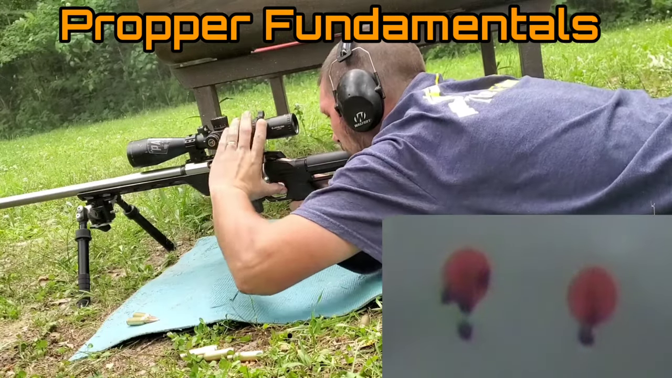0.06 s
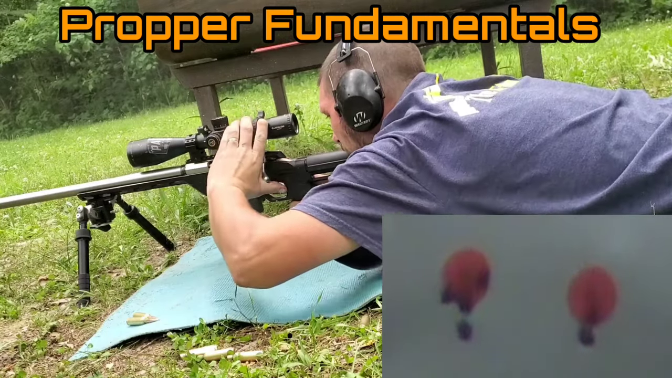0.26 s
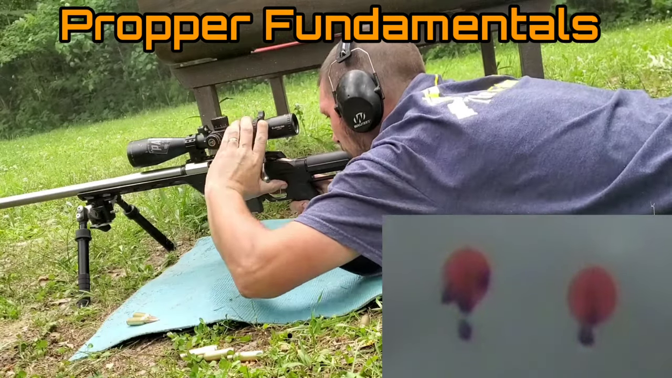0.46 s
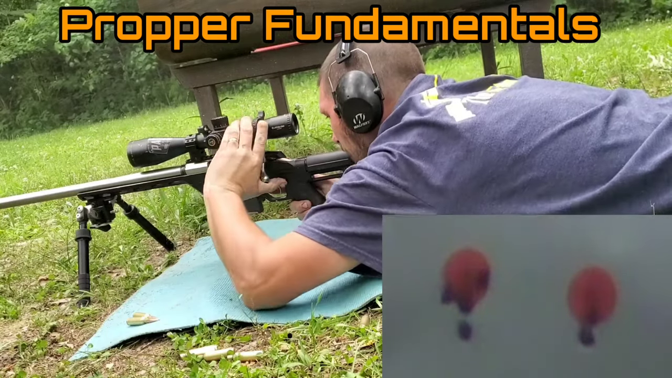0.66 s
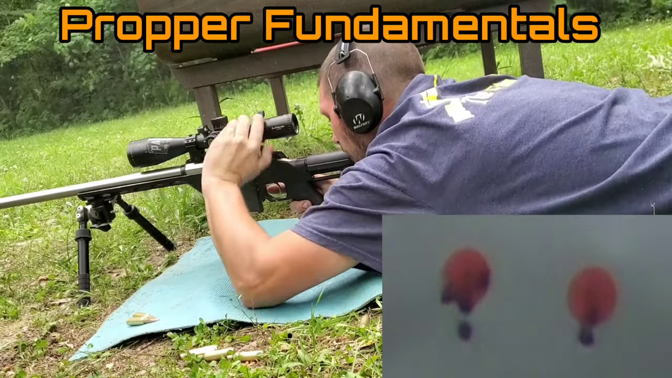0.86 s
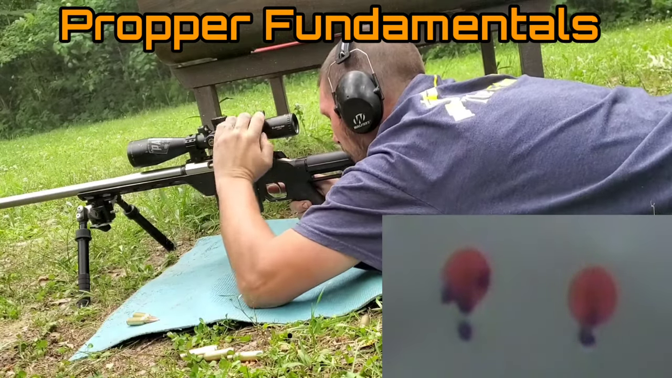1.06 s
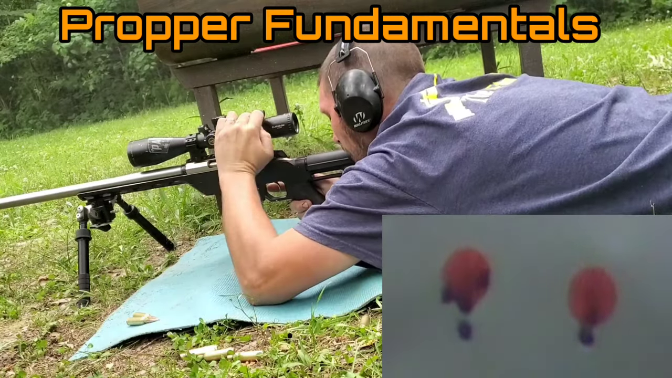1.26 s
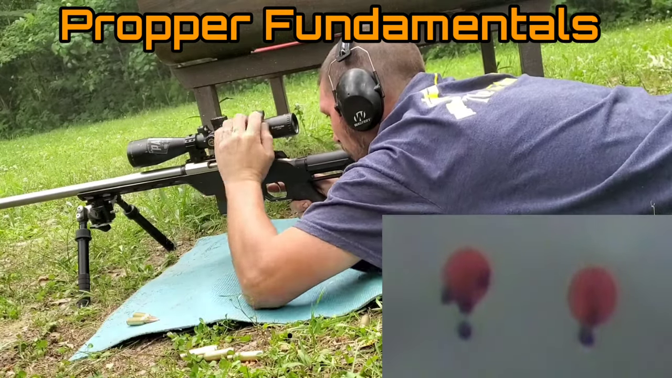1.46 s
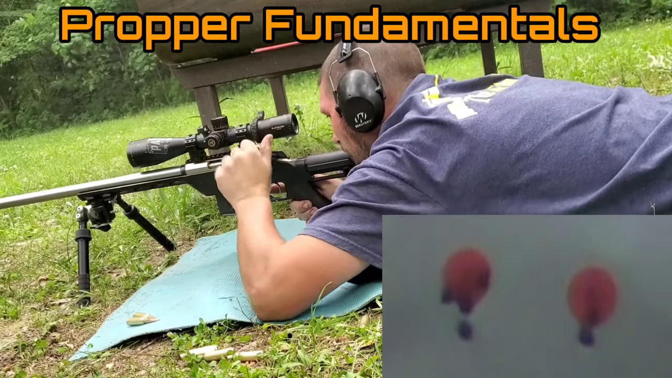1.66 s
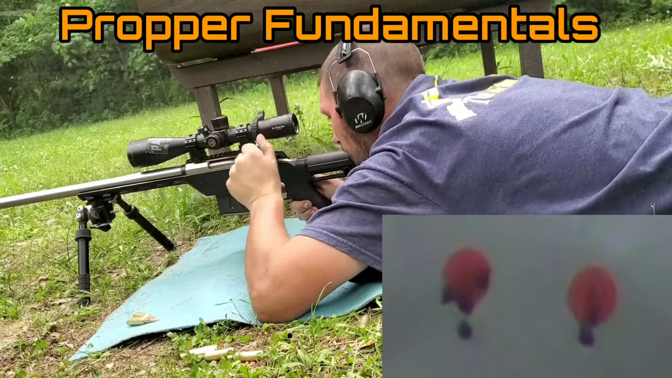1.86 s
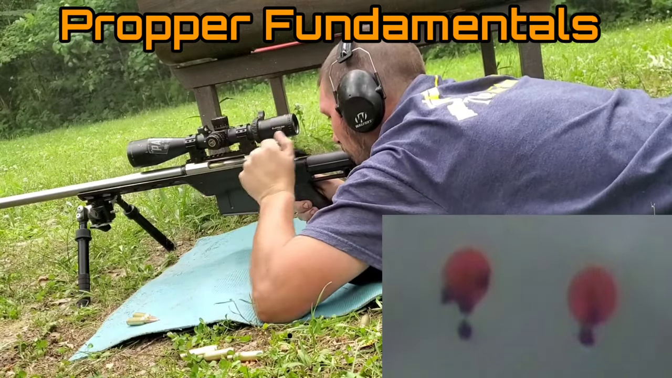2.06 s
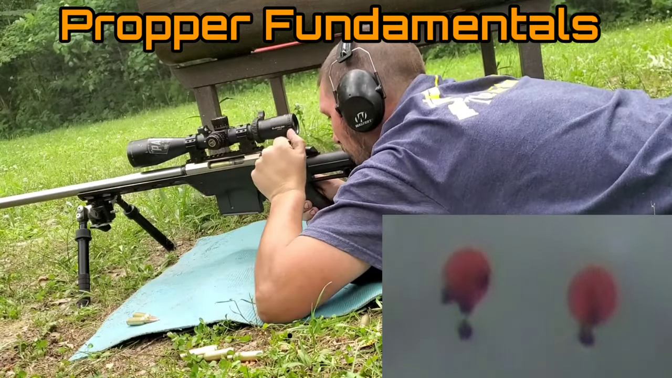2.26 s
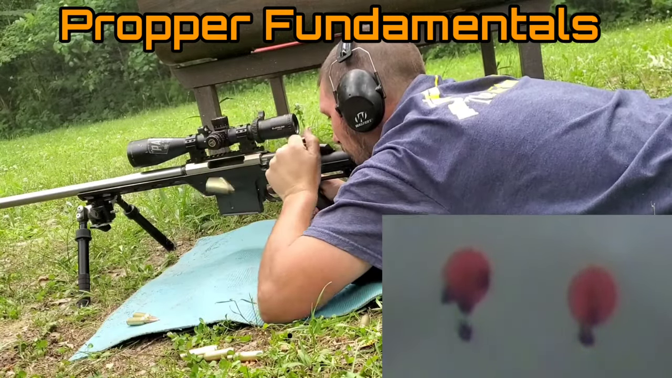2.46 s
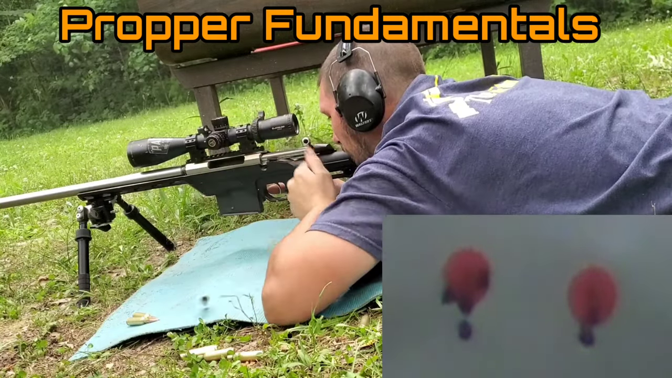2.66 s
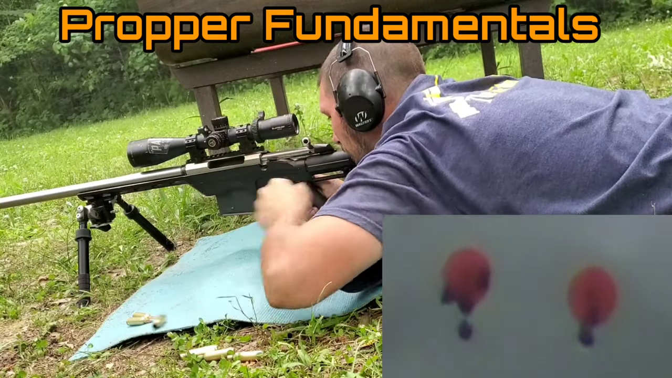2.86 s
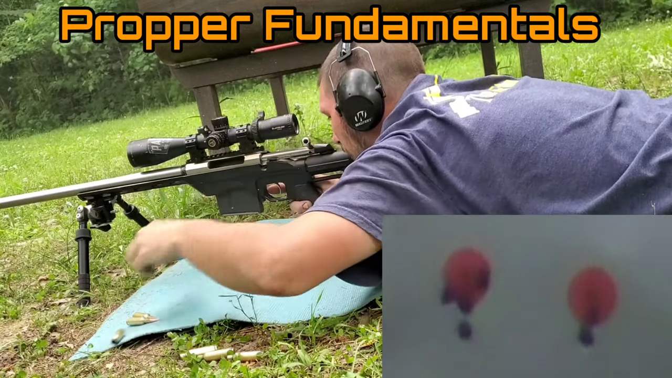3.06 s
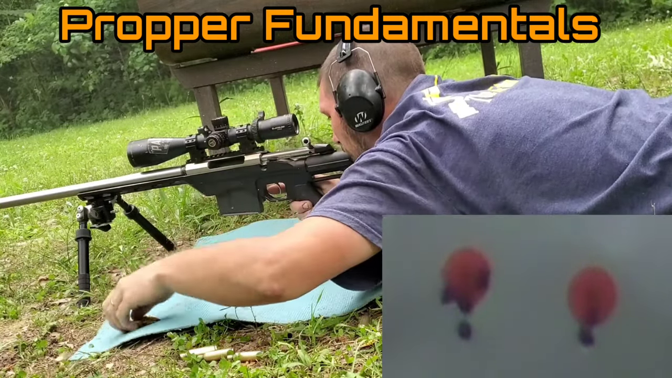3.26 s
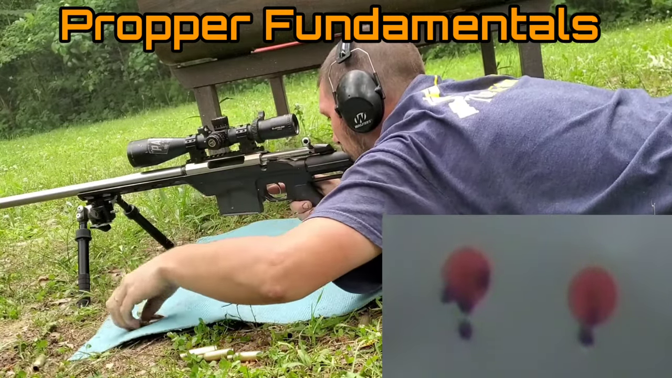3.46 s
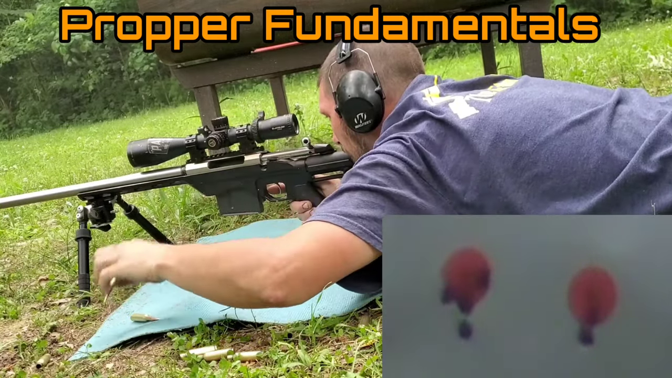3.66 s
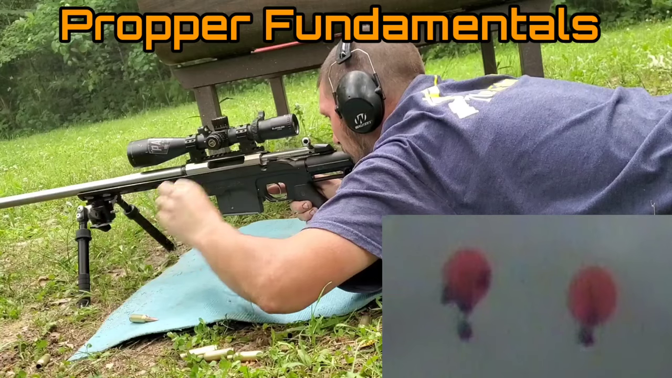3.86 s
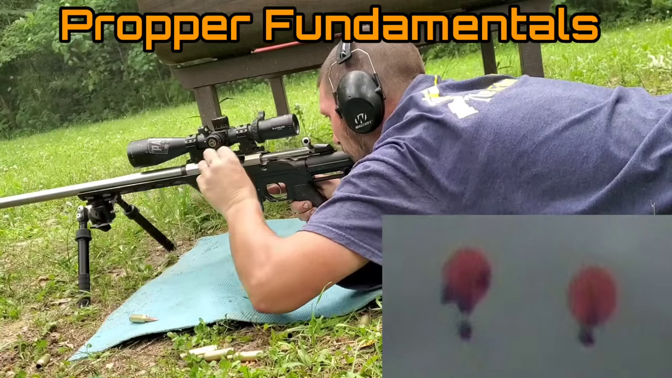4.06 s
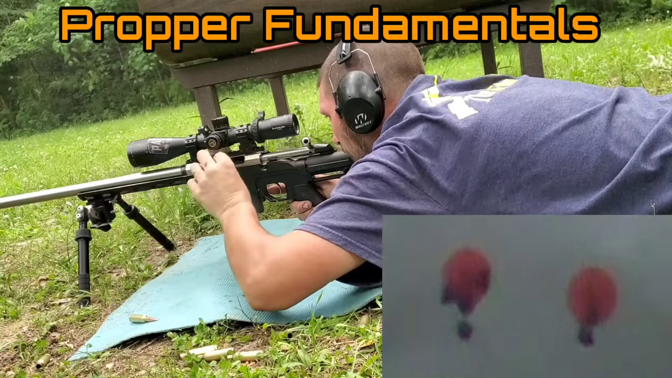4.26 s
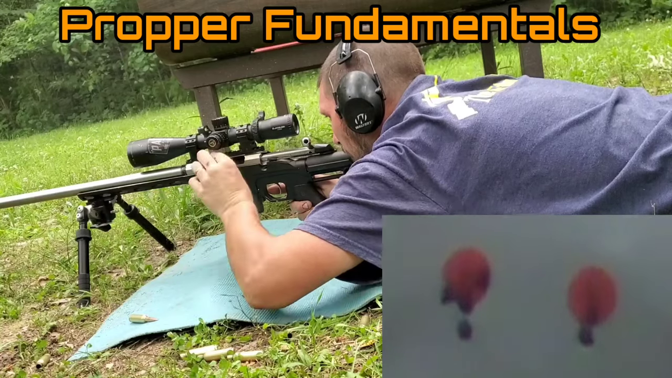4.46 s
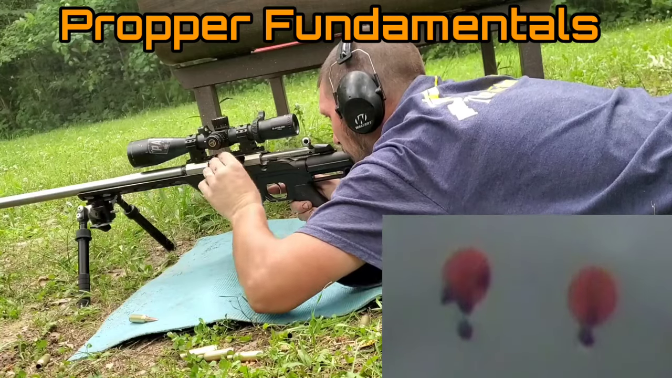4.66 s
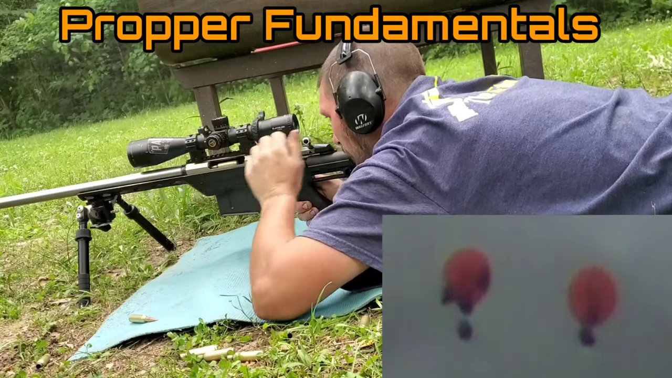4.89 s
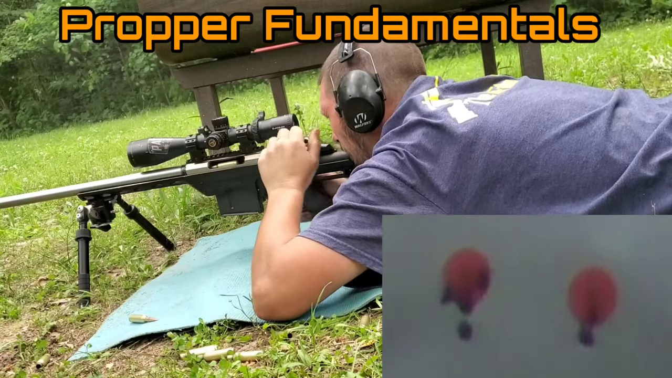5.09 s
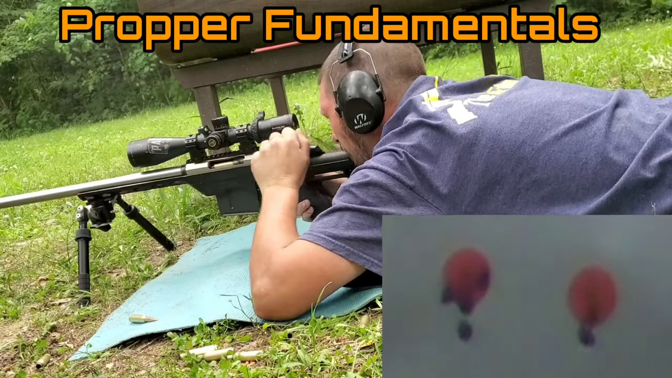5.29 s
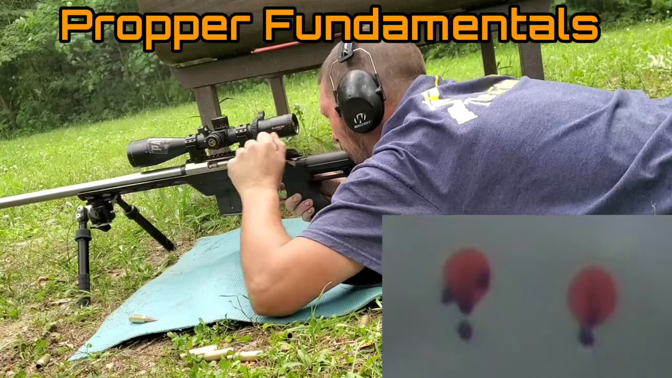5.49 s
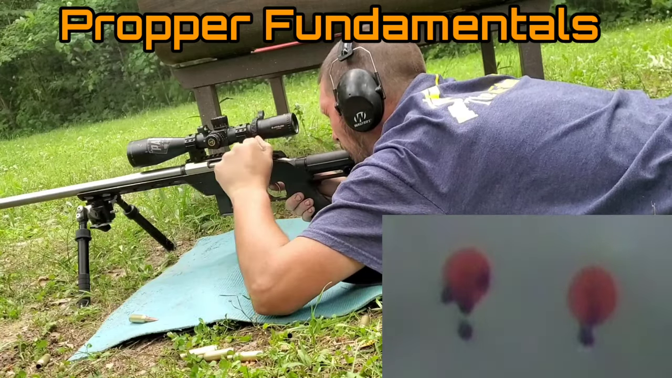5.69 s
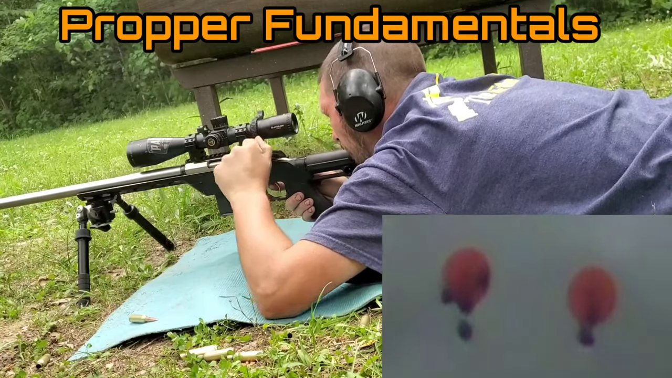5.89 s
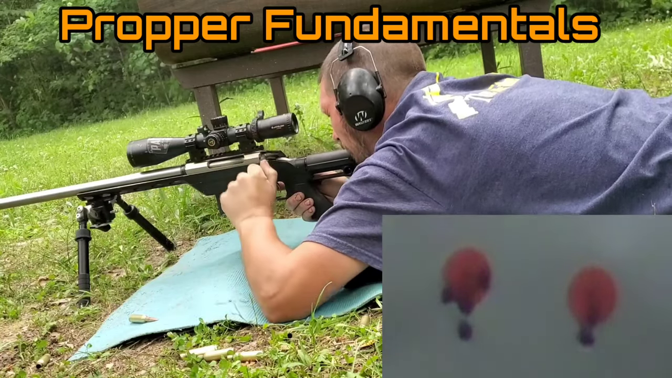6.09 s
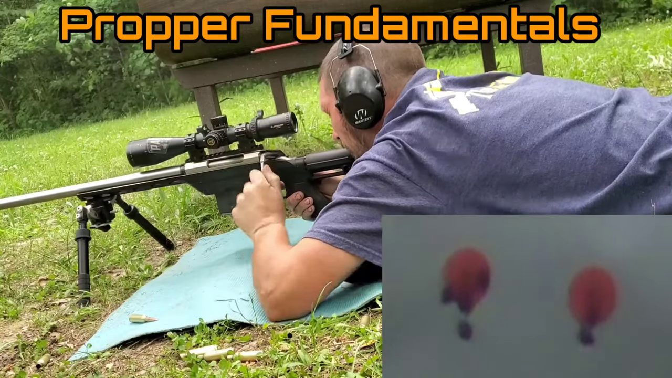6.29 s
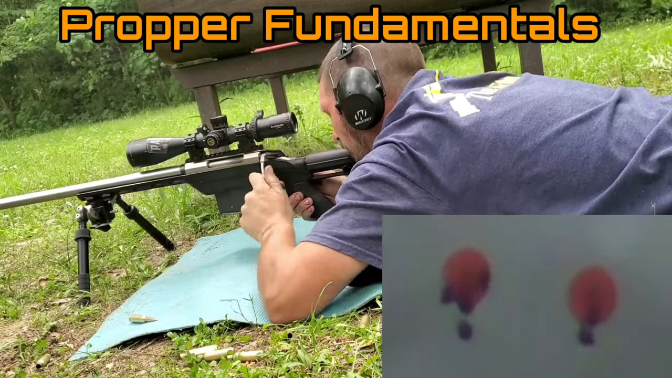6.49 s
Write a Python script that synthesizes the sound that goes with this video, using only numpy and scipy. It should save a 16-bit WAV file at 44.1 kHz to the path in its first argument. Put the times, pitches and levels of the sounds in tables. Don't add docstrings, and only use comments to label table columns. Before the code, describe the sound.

Outdoors in a grassy yard, two crickets trill steadily and high over faint traffic rumble and soft leaf hiss. Close on the left, a rifle bolt is lifted and drawn back with crisp steel clacks, and a spent case drops softly on a mat. After a quieter pause with small knocks, a round is fed and the bolt shut with harder, brighter snaps. Stereo camera microphone, dry and close.

```python
import sys
import numpy as np
from scipy import signal
from scipy.fft import rfft, irfft, next_fast_len
from scipy.io import wavfile
from scipy.ndimage import uniform_filter1d, map_coordinates

SR = 44100
rng = np.random.default_rng(int(sys.argv[2]) if len(sys.argv) > 2 else 0)


def volts_from_db(level):
    exponent = np.asarray(level, float) / 20
    return 10 ** exponent


def generate_wav(sig):
    pcm = np.round(np.clip(np.atleast_2d(sig).T, -1, 1) * 32767).astype(np.int16)
    wavfile.write(sys.argv[1], SR, pcm)


N = 288088

# frequency in Hz, level in dB per Hz.
RUMBLE_SPECTRUM = [(12, -35), (20, -12.5), (59, -1.5), (97, -6.5), (128, -8), (161, -12.5), (338, -16),
                   (468, -19.5), (700, -25), (910, -35), (1540, -120)]
# frequency in Hz, level in dB per Hz.
HISS_SPECTRUM = [(250, -26), (500, -4.5), (1000, -5), (1800, -7), (2900, -9.5), (3600, -10), (4700, -14.5),
                 (6500, -16.5), (9300, -21), (12000, -20.5), (14300, -24), (14900, -39)]
# frequency in Hz, left-right likeness from -1 to 1.
PORT_LIKENESS = [(25, 0.95), (60, 1), (130, 0.89), (290, 0.66), (640, 0.19), (1400, -0.16), (3100, 0.17),
                 (7000, 0.47), (14000, 0.17)]
TRAFFIC_DB, LEAVES_DB, CALMING_DB_PER_S = -51.5, -60, -0.21

STROKES_PER_S = 40.8
# time in seconds, near and far cricket drift in cycles.
STROKE_DRIFT = [(0, .23, 1.73), (1.3, .2, .7), (2.5, .25, -.25), (3.6, .33, -1.18), (4.75, .23, -2.27),
                (5.85, .19, -3.31), (6.6, .11, -4.05)]
# time in seconds, effort in dB.
TRILL_EFFORT = [(0, -53), (.2, -50.5), (.5, -54), (.8, -51.5), (3.6, -50.5), (5.26, -51.5), (5.87, -50.5),
                (6.53, -52)]
# frequency in Hz, t60 in seconds.
YARD_DECAY = [(500, 0.29), (3000, 0.13), (8000, 1), (14000, 0.2)]

# frequency in Hz, width in Hz, level in dB.
RECEIVER_MODES = [(2020, 960, -13.5), (2726, 85, 0.5), (3520, 630, 3.5), (3747, 1015, 4.5), (4500, 2360, 2),
                  (5200, 1100, 6.5)]
BOLT_MODES = [(6080, 1220, 1), (6940, 580, 3.5), (7910, 560, -5.5), (8260, 220, 3), (9460, 1000, -12.5)]
SMALL_PART_MODES = [(11500, 800, -9), (13600, 520, 0), (12940, 2800, 27), (14500, 560, 3)]
STOCK_MODES = [(432, 250, -7), (644, 63, 4.5), (1189, 118, 1.5), (1480, 145, -3)]
MAT_MODES = [(120, 130, -5), (500, 900, -8), (1240, 230, -1)]

RAIL_SLAPS = [(2.1874, -33, 0, 5100), (2.1944, -45, 6, 2720), (2.2134, -24, -5, 4860),
              (2.2155, -26, 3, 4500), (4.6584, -44, -2, 4900), (4.6675, -32, -5, 4500),
              (5.757, -31, -12, 3000), (5.3797, -47, 0, 3370), (5.7404, -20, -2, 4870)]
BOLT_STOPS = [(.8845, -48, 10, 4000), (.8869, -24, -2, 3900), (.9644, -33.5, -3, 4500),
              (2.2438, -32.5, -4, 3720), (2.4428, -26.5, -15, 3620), (2.4534, -28.5, -5, 3070),
              (4.6823, -21.5, 6, 3730)]
LOOSE_RATTLES = [(1.325, -37, -4, 3740), (1.3274, -25, 7, 3750), (4.7147, -27, -14, 3970),
                 (5.3986, -25, -11, 3160), (5.4914, -29.5, -11, 3880), (5.5578, -38.5, -18, 3640),
                 (5.7600, -13, -5.5, 5200), (6.1335, -35.5, -11, 3470)]
CATCH_SNAPS = [(.9767, -31.5, -5, 3200), (1.3396, -19.5, 1, 3900), (2.4932, -31.5, -30, 3570),
               (4.3794, -49, -14, 3540), (4.400, -50, -14, 3500), (4.423, -50, -11, 3600),
               (5.5288, -40.5, -9, 3580), (5.7632, -22, -0.5, 3500), (6.124, -36.5, 3.5, 4050),
               (6.3714, -25, -4, 3120)]
TIGHT_DB, LOOSE_DB = -13.5, -0.5
STILL_DB, JOLTED_DB = -23, -13.5
# start in seconds, stock peak in dB, receiver re stock in dB.
STOCK_KNOCKS = [(.9502, -42, 5), (2.0497, -53, 4), (2.0654, -45, -3), (2.159, -50.5, 3), (2.726, -41.5, -5),
                (4.1654, -47.5, 1), (4.5106, -47, 0), (4.7054, -35.5, 5), (4.799, -47, -8),
                (4.8396, -49, -9), (5.1627, -46, -3.5), (5.3287, -50, -6), (5.5764, -44.5, 3.5),
                (5.5894, -50, 3)]
# start in seconds, length in seconds, receiver peak in dB, bolt and stock re receiver in dB.
STEEL_SLIDES = [(0.893, 0.02, -31.5, -2, -6.5), (0.956, 0.037, -38.5, -12, -4),
                (1.332, 0.042, -28.5, -7, -5), (2.221, 0.039, -33.5, -15, -10),
                (2.485, 0.027, -38, -21, -18), (4.657, 0.0089, -42, -8, -20), (4.694, 0.033, -28, -8, -11),
                (4.743, 0.022, -33.5, 4, -5.5), (5.735, 0.016, -35, -11, -4), (5.764, 0.031, -26, -3, -20),
                (6.128, .025, -39.5, 0, -5), (6.359, 0.042, -44, -9, -18)]

# start in seconds, pitch in Hz, peak in dB.
HELD_CLANGS = [(0.8884, 3840, -19.5), (0.888, 4290, -24), (0.976, 2990, -27), (1.328, 3650, -20),
               (1.339, 2930, -20.5), (2.4932, 3416, -12), (2.4934, 3730, -17.5), (5.560, 12150, -25),
               (5.7606, 3020, -24), (6.123, 14300, -19), (6.373, 3200, -27.5)]
CLANG_T60_S = 0.02
# start in seconds, peak in dB.
HOLLOW_TONE = (660, .07)
HOLLOW_RINGS = [(.978, -46), (1.343, -33.5), (2.218, -48), (2.246, -44), (4.701, -33), (5.765, -35.5)]
LUG_TONE = (2770, .1)
LUG_RINGS = [(2.189, -40), (2.443, -38)]
HANDLE_TONE = (4110, 0.068)
HANDLE_RINGS = [(4.684, -33), (4.7156, -33.5), (5.399, -26), (5.493, -33)]
SHROUD_TONE = (8400, 0.15)
SHROUD_RINGS = [(5.762, -34)]
CASE_TONE = (9450, 0.18)
CASE_RINGS = [(2.217, -42), (2.456, -38)]
ROUND_TONE = (12300, 0.065)
ROUND_RINGS = [(5.400, -40), (5.493, -37), (5.531, -41)]
SPRING_TONE = (14210, 0.048)
SPRING_RINGS = [(2.194, -23.5), (2.214, -17), (2.444, -29), (2.495, -38)]

# start in seconds, peak in dB.
HARD_CRACKS = [
    (1.3277, -24),
    (4.6825, -17.5),
    (5.7408, -26),
    (5.7612, -23),
]
CRACK_S = .00012
# start in seconds, peak in dB.
CASE_LANDING = (2.7243, -33)

# frequency in Hz, left-right difference in dB.
BODY_SHADOW = [(300, -2), (900, -2), (1600, 3), (2500, 14), (5000, 9), (9000, 5), (14000, 8)]
# frequency in Hz, lead in samples.
LEFT_LEAD = [(700, 8), (2500, 16)]
# frequency in Hz, gain in dB.
TOP_ROLLOFF = [(14500, 0), (15200, -15), (16550, -22), (16700, -90)]


def unit(x):
    return x / np.sqrt(np.mean(x ** 2) + 1e-20)


def along(points, hz):
    f, v = np.transpose(points)
    return np.interp(np.log(hz + 1), np.log(f + 1), v)


def curves(rows):
    s, *cols = np.transpose(rows)
    return [np.interp(np.arange(N) / SR, s, c) for c in cols]


def wobble(rate):
    knots = rng.standard_normal(int(N * rate / SR) + 4)
    return map_coordinates(knots, [np.arange(N) * rate / SR])


def filtered(x, response):
    m = next_fast_len(x.shape[-1] + 4096)
    return irfft(rfft(x, m) * response(np.fft.rfftfreq(m, 1 / SR)), m)[..., :x.shape[-1]]


def rush(spectrum, patchy_db):
    z = signal.stft(rng.standard_normal((2, N)), nperseg=512)[2]
    patches = uniform_filter1d(rng.standard_normal(z.shape[1:]), 6, 0)
    patches = uniform_filter1d(patches, 14, 1)
    pair = signal.istft(z * volts_from_db(patchy_db * unit(patches)), nperseg=512)[1][:, :N]

    def mid_side(hz):
        angle = np.arccos(np.clip(along(PORT_LIKENESS, hz), -1, 1)) / 2
        return volts_from_db(along(spectrum, hz)) * [np.cos(angle), np.sin(angle)]

    mid, side = filtered(pair, mid_side)
    return unit(np.array([mid + side, mid - side]))


def air():
    calming_db = CALMING_DB_PER_S * np.arange(N) / SR
    leaves_db = LEAVES_DB + calming_db + 1.0 * wobble(1.29) + [[4.5], [3.5]]
    traffic_db = TRAFFIC_DB + calming_db + 0.58 * wobble(3.01)
    leaves = volts_from_db(leaves_db) * rush(HISS_SPECTRUM, patchy_db=1.18)
    traffic = volts_from_db(traffic_db) * rush(RUMBLE_SPECTRUM, patchy_db=-0.25)
    return traffic + leaves


def cricket(drift, wing_hz, overtone_db):
    t = np.arange(N) / SR
    place = (STROKES_PER_S * t + drift + .5) % 1 - .5
    late = np.clip(place - .02, 0, .3)
    opening = np.clip((place + 0.22) / 0.029, 0, 1)
    closing = np.clip((.31 - place) / 0.036, 0, 1)
    gate = opening * volts_from_db(-150 * late ** 2) * closing * volts_from_db(1.74 * wobble(40))
    phase = 2 * np.pi * np.cumsum(wing_hz + 18 * wobble(25) - 7000 * late ** 2) / SR
    octave = gate * volts_from_db(-150 * (place - .06) ** 2) * np.sin(2 * phase)
    return unit(gate * np.sin(phase)) + volts_from_db(overtone_db) * unit(octave)


def yard(x, gap_s):
    hz, t, z = signal.stft(rng.standard_normal((2, SR // 3)), SR, nperseg=256)
    decay = volts_from_db(-60 * t / along(YARD_DECAY, hz)[:, None])
    tail = signal.istft(z * decay, SR, nperseg=256)[1]
    delayed = np.pad(x, (round(gap_s * SR), 0))[None]
    return signal.fftconvolve(delayed, tail / np.linalg.norm(tail[0]), axes=1)[:, :N]


def crickets():
    near_drift, far_drift = curves(STROKE_DRIFT)
    near = cricket(near_drift, wing_hz=5518, overtone_db=-17)
    far = cricket(far_drift, wing_hz=5467, overtone_db=-11.0)
    chorus_spectrum = [(4700, -60), (5000, -24), (5350, -5), (5500, 0), (5650, -12), (6000, -27), (6400, -60)]
    chorus = volts_from_db(-11) * rush(chorus_spectrum, patchy_db=1.5)
    both = near * volts_from_db([[-3.5], [-2.5]]) + far * volts_from_db([[-9], [-11]])
    smear = volts_from_db(-8) * yard(both[0], gap_s=.003)
    return volts_from_db(curves(TRILL_EFFORT)[0]) * (both + smear + chorus)


def chatter(t, shape, shared):
    common, spikes, *own = rng.standard_normal((4, len(t)))
    own = np.array(own)
    noise = shared * common + np.sqrt(1 - shared ** 2) * own
    scatter = volts_from_db(-22.5 - 60 * t / 0.33) * (1 - np.exp(-t / 0.0015)) * own
    return shape * np.exp(.4 * spikes) * noise + scatter


def struck(force, modes, favoured_hz=None):
    gains = rng.standard_normal(len(modes)) * 1.5
    if favoured_hz:
        distance = np.abs(np.log(np.transpose(modes)[0] / favoured_hz))
        gains = gains - np.minimum(30 * distance, 11)

    def resonances(f):
        total = 0
        for k, ((hz, width, db), gain) in enumerate(zip(modes, gains)):
            peak = 1j * f * width / (hz * hz - f * f + 1j * f * width)
            total = total + (-1) ** k * volts_from_db(db + gain) * peak
        return total

    answer = filtered(force, resonances)
    return answer / np.abs(answer).max()


def gun(force, bolt_db, small_db, stock_db, favoured_hz=None):
    receiver = struck(force, RECEIVER_MODES, favoured_hz)
    bolt = volts_from_db(bolt_db) * struck(force, BOLT_MODES)
    small_parts = volts_from_db(small_db) * struck(force, SMALL_PART_MODES)
    stock = volts_from_db(stock_db) * struck(force, STOCK_MODES)
    return receiver + bolt + small_parts + stock


def blows():
    kinds = [(RAIL_SLAPS, TIGHT_DB, STILL_DB), (BOLT_STOPS, TIGHT_DB, JOLTED_DB),
             (LOOSE_RATTLES, LOOSE_DB, STILL_DB), (CATCH_SNAPS, LOOSE_DB, JOLTED_DB)]
    hits = []
    for rows, small_db, stock_db in kinds:
        for s, db, bolt_db, hz in rows:
            hits.append((s, db, bolt_db, bolt_db + small_db, stock_db, hz))
    for s, stock_peak_db, receiver_db in STOCK_KNOCKS:
        hits.append((s, stock_peak_db + receiver_db, -5.5, -20, -receiver_db, 4000))
    return hits


def rings():
    free = [(HOLLOW_TONE, HOLLOW_RINGS), (LUG_TONE, LUG_RINGS), (HANDLE_TONE, HANDLE_RINGS),
            (SHROUD_TONE, SHROUD_RINGS), (CASE_TONE, CASE_RINGS), (ROUND_TONE, ROUND_RINGS),
            (SPRING_TONE, SPRING_RINGS)]
    clangs = [(*row, CLANG_T60_S) for row in HELD_CLANGS]
    return clangs + [(s, hz, db, t60) for (hz, t60), hits in free for s, db in hits]


def ringing(t, hz, t60):
    waver = np.cumsum(rng.standard_normal((2, len(t))), axis=1) * .035
    swell = volts_from_db(2.2 * unit(uniform_filter1d(rng.standard_normal(len(t)), size=300)))
    envelope = swell * volts_from_db(-60 * t / t60) * (1 - np.exp(-t / 0.00057))
    return envelope * np.sin(2 * np.pi * hz * t + waver)


def rifle():
    out, t = np.zeros((2, N + SR)), np.arange(SR // 5) / SR

    def place(s, sound):
        out[:, round(s * SR):][:, :len(t)] += sound

    blow = (1 - np.exp(-t / .0004)) * (volts_from_db(-60 * t / .033) + volts_from_db(9 - 60 * t / .006))
    for s, db, *parts in blows():
        place(s, volts_from_db(db + 5.5) * gun(chatter(t, blow, shared=0.57), *parts))
    for s, length, db, bolt_db, stock_db in STEEL_SLIDES:
        stroke = np.abs(np.sin(np.pi * np.clip(t / length, 0, 1) ** 0.53))
        small_db = bolt_db - 0.5
        place(s, volts_from_db(db) * gun(chatter(t, stroke, shared=0.57), bolt_db, small_db, stock_db))
    for s, hz, db, t60 in rings():
        place(s, volts_from_db(db) * ringing(t, hz, t60))
    for s, db in HARD_CRACKS:
        place(s, volts_from_db(db) * (1 - t / CRACK_S) * np.exp(-t / CRACK_S))
    s, db = CASE_LANDING
    place(s, volts_from_db(db) * struck(chatter(t, blow, shared=0.78), MAT_MODES))
    return out[:, :N]


def scene():
    sides = np.array([[.5], [-.5]])

    def from_left(hz):
        lead = np.exp(2j * np.pi * hz * sides * along(LEFT_LEAD, hz) / SR)
        return volts_from_db(sides * along(BODY_SHADOW, hz)) * lead

    return air() + crickets() + filtered(rifle(), from_left)


def top_cut(x):
    return signal.sosfilt(signal.butter(12, 16620, fs=SR, output="sos"), x)


def record(dry):
    mix = filtered(dry, lambda hz: volts_from_db(along(TOP_ROLLOFF, hz)))
    return top_cut(mix)


dry = scene()
out = record(dry)
generate_wav(out)
```